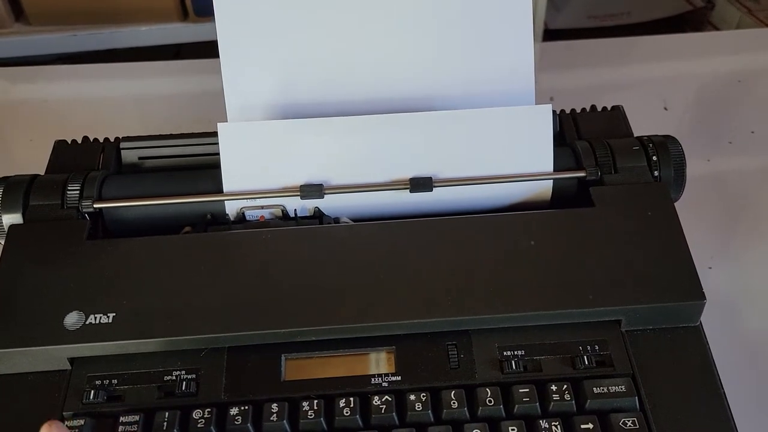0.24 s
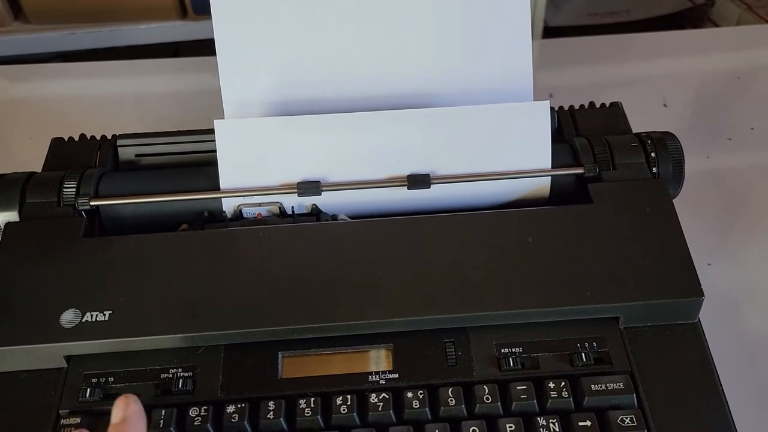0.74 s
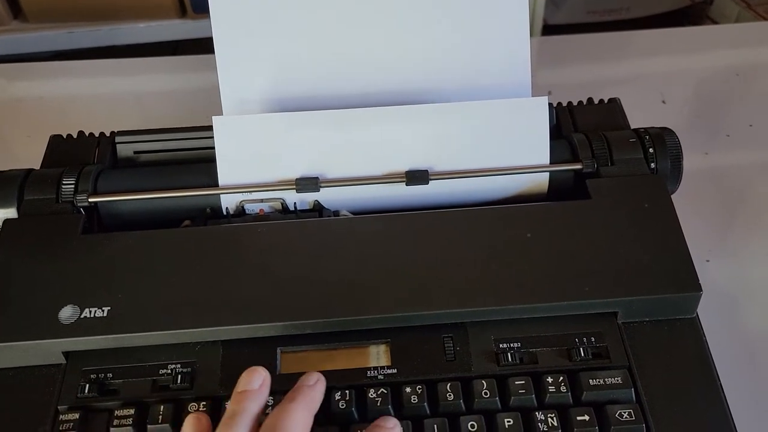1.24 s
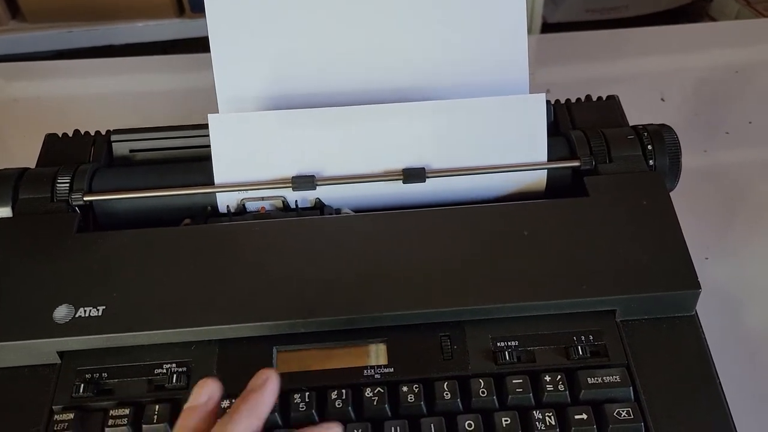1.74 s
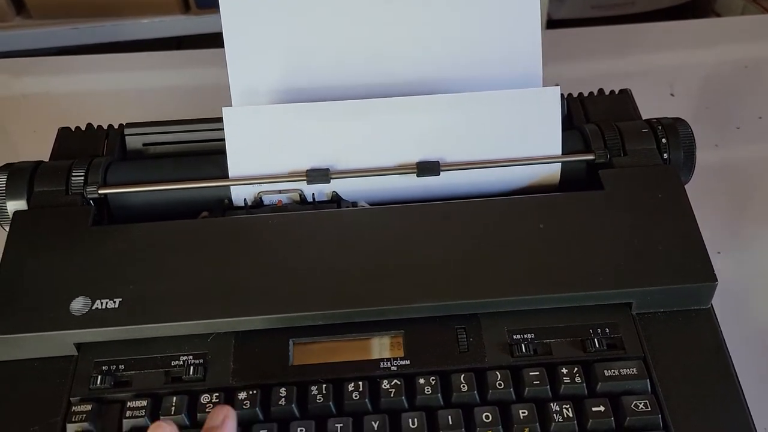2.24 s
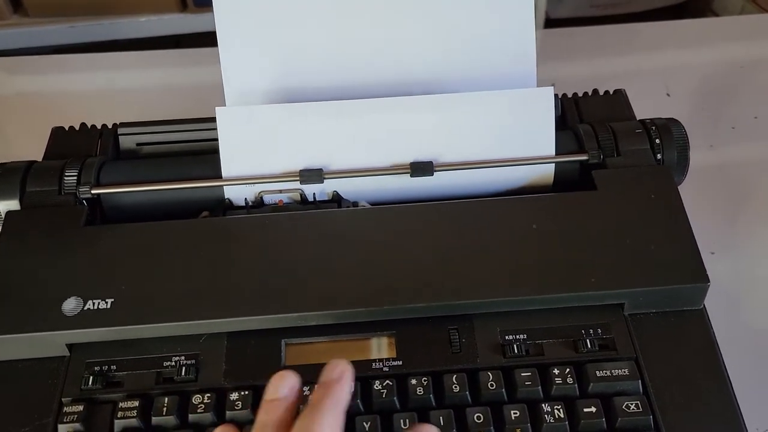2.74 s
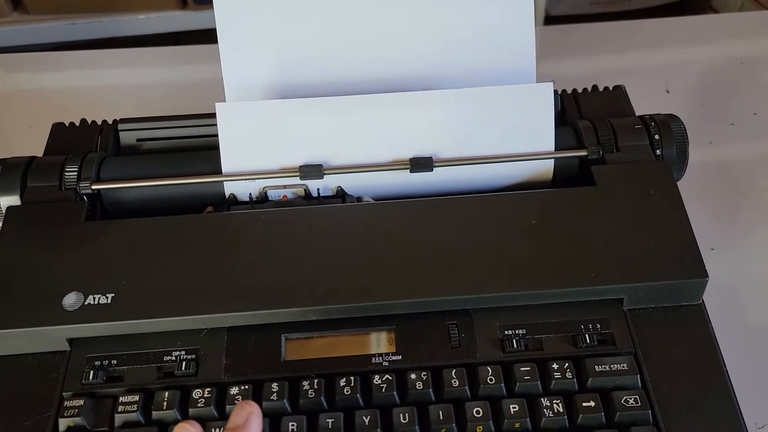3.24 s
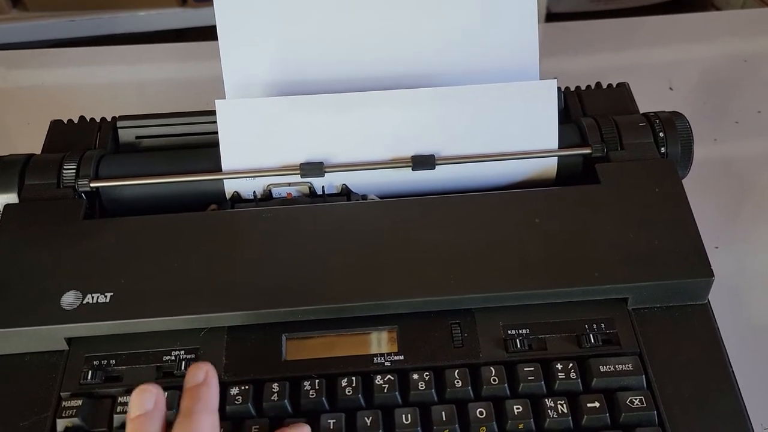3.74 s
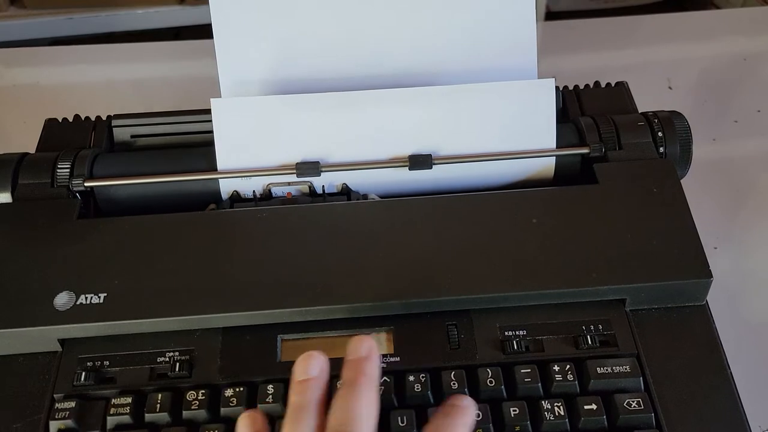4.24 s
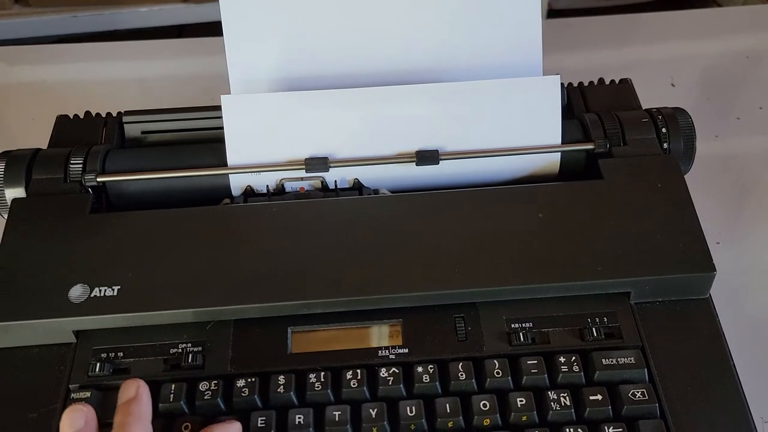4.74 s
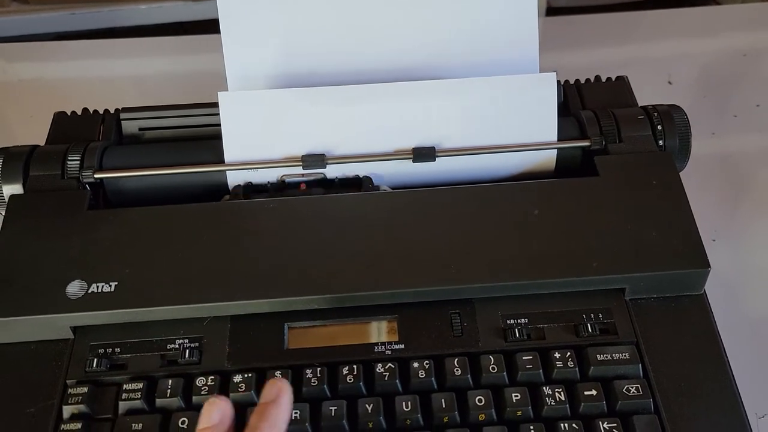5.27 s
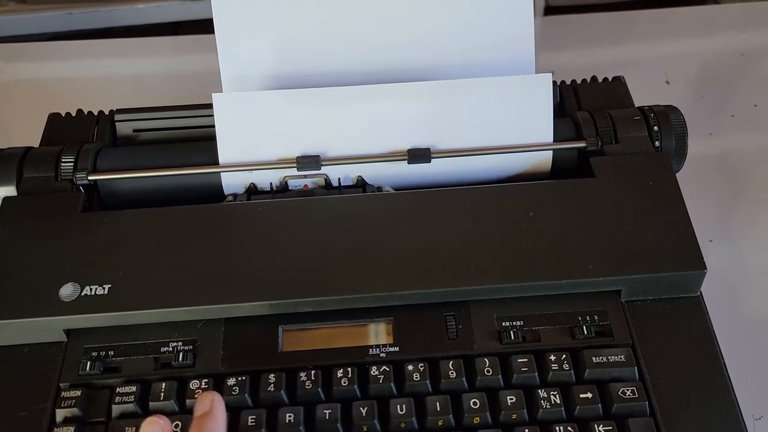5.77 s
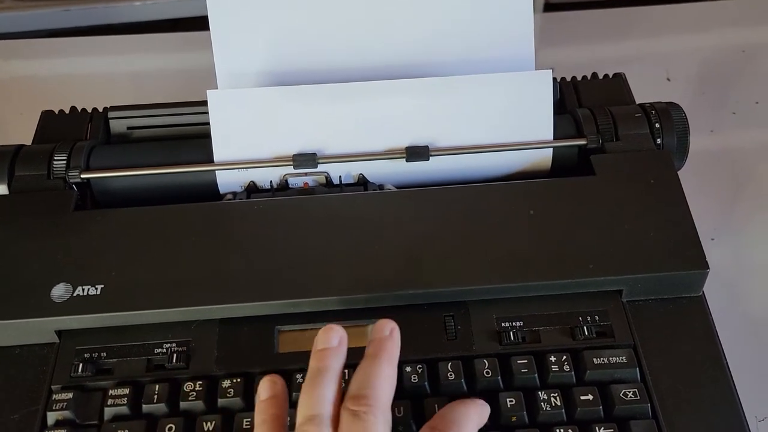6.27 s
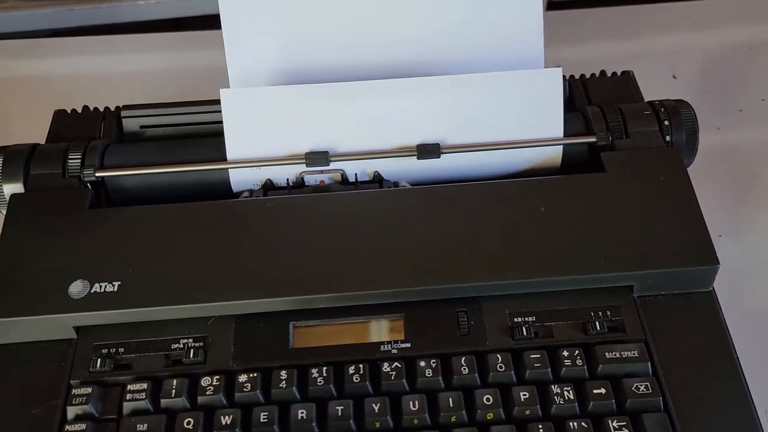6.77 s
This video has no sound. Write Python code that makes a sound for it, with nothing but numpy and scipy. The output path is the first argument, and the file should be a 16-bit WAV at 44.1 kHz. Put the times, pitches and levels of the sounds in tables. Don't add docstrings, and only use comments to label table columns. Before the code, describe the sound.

Someone types slowly on an electric typewriter, each letter a key click, short motor whirr and sharp hammer crack, over a faint low hum.

```python
import sys
import numpy as np
from scipy import signal
from scipy.fft import rfft, irfft, next_fast_len
from scipy.io import wavfile
from scipy.ndimage import uniform_filter1d

SR = 44100
rng = np.random.default_rng(int(sys.argv[2]) if len(sys.argv) > 2 else 0)


def decibels_to_gain(level_db):
    exponent = np.asarray(level_db, float) / 20
    return 10 ** exponent


def materialize(psi):
    bounded = np.clip(np.atleast_2d(psi).T, -1, 1)
    quanta = np.round(bounded * 32767).astype(np.int16)
    wavfile.write(sys.argv[1], SR, quanta)


N = 309141


def evened(x):
    return x / np.sqrt(np.mean(x ** 2) + 1e-20)


def read(points, hz):
    f, value = np.transpose(points)
    return np.interp(np.log(hz + 1), np.log(f + 1), value)


def add(mix, start_s, sound):
    part = mix[..., round(start_s * SR):][..., :sound.shape[-1]]
    part += sound[..., :part.shape[-1]]


def bandpass(x, low_hz, high_hz):
    return signal.sosfilt(signal.butter(2, [low_hz, high_hz], "band", fs=SR, output="sos"), x)


def ring(modes):
    t = np.arange(SR // 3) / SR
    return sum(decibels_to_gain(db - 60 * t / t60) * np.sin(2 * np.pi * hz * t) for hz, db, t60 in modes)


def through(x, peaks):
    damped = [(hz, max(width, 0.09 * hz), db) for hz, width, db in peaks]
    body = ring([(hz, db + 10 * np.log10(width), 2.2 / width) for hz, width, db in damped])[:2048]
    body = bandpass(body, 0.8 * peaks[0][0], min(1.2 * peaks[-1][0], 0.45 * SR))
    return signal.oaconvolve(x, body[None] / np.linalg.norm(body), axes=1)[:, :N]


def pair(shape, apart):
    both, left, right = rng.standard_normal((shape, 3)).T
    return np.array([both + apart * left, both + apart * right]) / np.sqrt(1 + apart ** 2)


def scrape(db, knock_db, snap_db, tick_db, t60, rise=0.0018):
    t = np.arange(4000) / SR
    shape = decibels_to_gain(db - 60 * t / max(t60, 0.004)) * np.minimum(t / rise, 1)
    return np.array([decibels_to_gain(re_db) * shape * pair(len(t), apart=0.86)
                     for re_db in (knock_db, 0, snap_db, tick_db)])


# centre in Hz, width in Hz, level in dB.
PLATE_PEAKS = [(376, 42, -5.5), (651, 500, -2), (848, 270, 1), (1210, 1000, 0.5)]
# centre in Hz, width in Hz, level in dB.
SHELL_PEAKS = [(1442, 100, -9.5), (2100, 400, -13.5), (2590, 1100, 4.5), (3085, 790, 1)]
# centre in Hz, width in Hz, level in dB.
RIB_PEAKS = [(4140, 240, -1.1), (4730, 630, 0.32), (5450, 1200, -2.4)]
# centre in Hz, width in Hz, level in dB.
TINE_PEAKS = [(6640, 2000, 6.5), (8100, 8800, 1), (10940, 6000, -7.5), (13000, 3100, -2.5),
              (15000, 2000, -8)]


def shake_bodies(drive):
    bodies = (PLATE_PEAKS, SHELL_PEAKS, RIB_PEAKS, TINE_PEAKS)
    return sum(through(x, body) for x, body in zip(drive, bodies))


# frequency in Hz, density in dB per Hz.
AIR_SPECTRUM = [(15, -55), (28, -36), (42, -6), (59, -2), (82, -2), (120, -12), (160, -19), (250, -17),
                (450, -24), (1200, -22), (2000, -29), (3500, -35), (5000, -44), (9000, -52), (16000, -45)]
# frequency in Hz, correlation from -1 to 1.
AIR_LIKENESS = [(60, 0.8), (180, 0.7), (550, -0.21), (1650, -0.3), (4970, -0.1), (15000, -0.02)]
# time in seconds, hum in dB, room tone in dB.
AIR_LEVELS = [(0.0, -53, -67), (0.82, -64, -72.5), (1.07, -58.5, -73), (3.119, -59, -68.5),
              (4.16, -60.5, -68.5), (5.27, -58.5, -69), (7.01, -64, -68)]


def air():
    frames, hz = N // 512 + 5, np.fft.rfftfreq(2048, 1 / SR)
    a, b, c, d, patches = rng.standard_normal((frames, 1025, 5)).T
    patches = evened(uniform_filter1d(uniform_filter1d(patches, 12, 0), 8, 1))
    same = np.clip(read(AIR_LIKENESS, hz), -1, 1)[:, None]
    left = a + 1j * b
    z = np.array([left, same * left + np.sqrt(1 - same ** 2) * (c + 1j * d)])
    z *= decibels_to_gain(read(AIR_SPECTRUM, hz)[:, None] + 1.5 * patches)
    s, *levels_db = np.transpose(AIR_LEVELS)
    out = np.zeros((2, N))
    for band, db in zip((hz < 200, hz >= 200), levels_db):
        part = signal.istft(z * band[:, None], nperseg=2048, noverlap=1536)[1][:, :N]
        out += evened(part) * decibels_to_gain(np.interp(np.arange(N) / SR, s, db))
    return out


# frequency in Hz, level in dB re low rumble.
HUM_LINES = [(59, -2.5), (87, -13.5), (118, -11), (250, -24), (392, -24)]


def hum():
    t = np.arange(N) / SR
    s, db = np.transpose(AIR_LEVELS)[:2]
    swell_db = 2.2 * np.sin(2 * np.pi * 1.5 * t) + 1.2 * np.sin(2 * np.pi * 6.5 * t)
    lines = sum(decibels_to_gain(line_db) * np.sin(2 * np.pi * hz * t) for hz, line_db in HUM_LINES)
    return decibels_to_gain(np.interp(t, s, db) + swell_db) * lines


# multiple of the step rate, level in dB.
WHINE_HARMONICS = [(1, 1), (2, 1), (3, -6)]


def whirl(s, db, whine_db, thrum_db, grind_db, fizz_db):
    t = np.arange(s[0], s[-1], 1 / SR)
    level = decibels_to_gain(np.interp(t, s, db)) * signal.windows.tukey(len(t), 0.1)
    teeth = evened(decibels_to_gain(2.2 * np.repeat(rng.standard_normal(len(t) // 60 + 1), 60)[:len(t)]))
    bright = np.minimum((t - s[0]) / 0.015, 1) ** 2
    knock, clack, snap, tick = (level * teeth * pair(len(t), apart=0.7) for _ in range(4))
    speed = 1 - 0.27 * np.exp(-(t - s[0] - 0.024) / 0.021) - 0.06 * np.exp((t - s[-1]) / 0.008)
    wobble = 1 + 0.08 * uniform_filter1d(rng.standard_normal(len(t)), 200)
    step_hz = 1650 * np.clip(speed, 0.72, 1) * wobble
    turns = np.cumsum(step_hz) / SR
    tones = sum(decibels_to_gain(g) * np.cos(2 * np.pi * k * turns) for k, g in WHINE_HARMONICS)
    whine = level * decibels_to_gain(np.interp(t, s, whine_db)) * tones
    return np.array([knock * decibels_to_gain(np.interp(t, s, thrum_db)), clack + whine,
                     snap * decibels_to_gain(grind_db) + 0.36 * whine, bright * tick * decibels_to_gain(fizz_db)])


# start in seconds, length in seconds, rattle in dB,
# whine in dB re rattle, detent click in dB.
SEEK_RUNS = [(0.879, 0.085, -38, -2, -36), (1.395, 0.099, -40, -5.5, -33), (1.657, 0.082, -39.5, -8, -53),
             (2.213, .071, -41, -2.5, -36.5), (2.65, 0.06, -41.5, 2, -37), (3.393, 0.078, -40, -3, -37.5),
             (3.755, 0.062, -40, -1.5, -51), (4.195, 0.078, -41, -2.5, -38),
             (4.746, .046, -42.5, 1.5, -28.5), (5.21, .068, -41, -3, -41.5), (5.837, .098, -40.5, 1.5, -32),
             (6.314, .077, -40, -4.5, -47), (6.902, 0.13, -41, 1, -39.5)]
# start in seconds, run in seconds,
# rattle in dB, sag over the run in dB.
HOME_RUNS = [(0, 0.018, -39.5, -2), (.055, 0.038, -46.5, 5.5), (.997, 0.12, -34, -10),
             (1.531, .078, -37, -1.5), (1.777, .1, -37.5, -6.5), (2.324, .086, -42, 3),
             (2.746, 0.094, -39, -2.3), (3.037, .07, -39.5, -9.5), (3.5, 0.079, -41, 3.5),
             (3.85, .084, -39.5, -1), (4.308, 0.094, -38, -4.5), (4.83, 0.098, -34, -11),
             (5.318, 0.1, -35.5, -7.5), (5.47, 0.031, -53, 13.5), (5.972, 0.11, -34.5, -11),
             (6.431, .082, -41, 1.9)]
# centre in Hz, width in Hz, level in dB.
FRAME_PEAKS = [(2420, 300, 6.5), (3180, 300, -4.5)]


def steppers():
    drive = np.zeros((4, 2, N))
    for start, length, db, whine_db, detent_db in SEEK_RUNS:
        spin_up_s, brake_s, swell_db = 0.021, 0.018, 1
        s = start + np.array([0, spin_up_s, length - brake_s, length])
        rattle_db = db + np.array([-19.5, 0, swell_db, swell_db - 5])
        sing_db = whine_db + np.array([-7, 0, -2, -2])
        add(drive, start, whirl(s, rattle_db, sing_db - 7.5, -17.0 + 0 * s, grind_db=-2.5, fizz_db=-6.0))
    for start, run, db, sag_db in HOME_RUNS:
        coast_s, coast_db = 0.048, -21.5
        s = start + np.array([0, run, run + coast_s])
        rattle_db = db + np.array([0, sag_db, sag_db + coast_db])
        add(drive, start, whirl(s, rattle_db, -17 + 0 * s, [-8.5, -8.5, -3], grind_db=-4.0, fizz_db=-5.5))
    return shake_bodies(drive) + decibels_to_gain(-3.5) * through(drive[1], FRAME_PEAKS)


# touch in seconds, touch in dB, tick in dB re touch, bottoming out after
# in seconds, bottom in dB.
KEY_PRESSES = [(.817, -43, -8, .013, -33), (1.3289, -44, -6, .0225, -37.5),
               (2.1699, -38.5, -9, .0075, -29.5), (2.608, -42, -14, .0103, -34.5),
               (3.3428, -31.5, -6, .007, -28.5), (3.704, -34.5, -4.5, 0.0067, -28),
               (4.125, -48, -13.5, 0.025, -39.5), (4.695, -43, -1.5, .0192, -40.5),
               (5.156, -37, -3.5, .0096, -37.5), (5.792, -33, -14, .01, -37.5),
               (6.263, -41.5, -7, .011, -37), (6.8487, -47, -13, .0179, -41)]
# start in seconds, peak in dB.
RIBBON_LIFTS = [(0.9579, -25.5), (1.4917, -25), (1.7373, -26.5), (2.2841, -26.5), (2.7056, -25),
                (3.46, -27), (3.8106, -27), (4.269, -27), (4.7901, -28), (5.2792, -28), (5.9338, -27),
                (6.392, -27)]
# start in seconds, peak in dB, t60 in seconds.
KEY_RETURNS = [(.0078, -16.5, 0.014), (0.0153, -21, 0.013), (.086, -25, 0.014), (.402, -69.5, .04),
               (1.4607, -21.5, .014), (1.6404, -16.5, .022), (3.1384, -27.5, .012), (4.2437, -17, 0.021),
               (5.257, -9.5, .011), (5.4358, -24, 0.021), (6.3506, -18, 0.021)]
# start in seconds, peak in dB, t60 in seconds.
BAR_LINKS = [
    (.0574, -35.5, .054),
    (.0647, -29, .044),
    (2.9723, -43, .054),
    (2.9855, -41.5, .023),
    (3.0005, -31.5, .06),
    (3.039, -26.5, .021),
    (3.1089, -35.5, .07),
    (5.466, -29, .045),
    (5.5533, -39.5, .098),
    (5.6521, -46.5, .033),
]


def contacts():
    rows = []  # (s, peak dB, knock dB, snap dB, tick dB, t60 s[, rise s])
    for s, db, tick_db, after_s, bottom_db in KEY_PRESSES:
        rows.append((s, db, -12, -9, tick_db - 6, 0.056, 0.0013))
        rows.append((s + after_s, bottom_db, 0, -14, -17, 0.0363))
    rows += [(run[0] + 0.027, run[-1], -21, -11.5, -14.5, 0.09) for run in SEEK_RUNS]
    rows += [(s + 0.0012, db, -11.5, -6, -8.5, 0.12) for s, db in RIBBON_LIFTS]
    rows += [(s, db, -13.5, -20.5, -16.5, t60) for s, db, t60 in KEY_RETURNS]
    rows += [(s, db, -9.5, -6.5, -16, t60) for s, db, t60 in BAR_LINKS]
    drive = np.zeros((4, 2, N))
    for s, *colour in rows:
        add(drive, s - 0.001, decibels_to_gain(2.5) * scrape(*colour))
    return shake_bodies(bandpass(drive, 380, 9500))


# start in seconds, level in dB.
SPACE_STEPS = [
    (0.056, -11),
    (3.042, -12),
    (5.47, -11),
]
# time in seconds, peak in dB, carriage latch in dB re peak.
HAMMER_BLOWS = [(.988, -7.5, -15.5), (1.5219, -6.5, -14.5), (1.7677, -6.5, -17), (2.315, -7, -15),
                (2.7367, -8, -14), (3.4905, -8, -13.5), (3.8409, -8, -13.5), (4.2988, -8, -14.5),
                (4.8205, -8.5, -14.5), (5.3081, -8.5, -14.5), (5.9634, -8.5, -14), (6.4216, -7.5, -14)]
# frequency in Hz, level in dB, t60 in seconds.
CASE_RING = [(58, -15, 0.084), (86, -0.5, 0.049), (133, -2.5, 0.041), (171, -5.5, 0.11), (332.7, 2, 0.081),
             (370, -5.5, .04), (660, -7, 0.065)]


def case_thuds():
    thud = np.zeros((2, N))
    for s, db in SPACE_STEPS:
        add(thud, s, decibels_to_gain(db - 9.0) * pair(2400, apart=0.45) * np.hanning(2400))
    for s, db, latch_db in HAMMER_BLOWS:
        add(thud, s + 0.0014, decibels_to_gain(db - 7) * pair(500, apart=0.45) * np.hanning(500))
        add(thud, s + 0.02, decibels_to_gain(db - 12) * pair(1800, apart=0.57) * np.hanning(1800))
    case = bandpass(ring(CASE_RING), 45, 900)
    return decibels_to_gain(-44) * signal.oaconvolve(thud, case[None], axes=1)[:, :N]


# start in seconds, peak in dB, length in seconds.
WIRE_ZIPS = [(0.108, -37.5, 0.018), (1.644, -37.5, .02), (.064, -39, 0.007), (2.973, -55, 0.013),
             (2.998, -40.5, 0.019), (3.111, -48, 0.014), (3.16, -48, .012), (4.698, -51, 0.011),
             (5.791, -46, .01)]
# centre in Hz, width in Hz, level in dB.
WIRE_PEAKS = [(8500, 3000, -7), (12400, 2000, 1), (15000, 2700, -4.5)]


def wires():
    drive = np.zeros((2, N))
    for s, db, length_s in WIRE_ZIPS + [(s, db + 1, 0.009) for s, db in RIBBON_LIFTS]:
        size = round(length_s * SR)
        add(drive, s - 0.003, decibels_to_gain(db) * np.hanning(size) * pair(size, apart=0.82))
    return through(drive, WIRE_PEAKS)


# start in seconds, peak in dB, chatter length in seconds,
# tick in dB re peak.
BAR_SPRINGS = [
    (0.108, -16.5, 0.03, -11.5),
    (3.1597, -23.5, 0.034, -12.5),
    (5.5819, -22, 0.034, -14),
]
# frequency in Hz, level in dB, t60 in seconds.
BAR_RING = [(1980, -12, .1), (2640, 4, .035), (2680, -25, .25), (3280, -7, .06), (3880, -6, .05),
            (5010, -5, .04), (5320, -28, .3), (5800, -4, .03), (7140, -7, .03)]


def space_bar():
    out = np.zeros((2, N))
    for s, db, length_s, tick_db in BAR_SPRINGS:
        t = np.arange(round(1.3 * length_s * SR)) / SR
        fade = signal.windows.tukey(len(t), 0.15) * (1 + 0.7 * np.exp(-t / 0.0047))
        hits = decibels_to_gain(db - 12 * t / length_s) * fade * pair(len(t), apart=1.0)
        hits = np.pad(hits, ((0, 0), (0, 2000)))
        add(out, s - 0.002, decibels_to_gain(-31.0) * signal.oaconvolve(hits, ring(BAR_RING)[None], axes=1))
        add(out, s - 0.002, shake_bodies([decibels_to_gain(body_db) * hits for body_db in (-15, -7, -9, tick_db)]))
    return out


# centre in Hz, width in Hz, level in dB.
SPRING_PEAKS = [(7500, 700, -6), (7800, 770, 0.5), (9600, 1200, -9)]


def springs():
    drive = np.zeros((2, N))
    for s, db, tick_db, after_s, bottom_db in KEY_PRESSES:
        add(drive, s, scrape(db + tick_db - 2, 0, 0, 0, 0.055)[1])
    return through(drive, SPRING_PEAKS)


def hammer_linkage():
    drive = np.zeros((4, 2, N))
    for s, db, latch_db in HAMMER_BLOWS:
        add(drive, s - 0.028, scrape(db - 27.5, -9.5, -7.5, -13.5, 0.84, rise=0.0061)[..., :1200])
        add(drive, s - 0.011, scrape(db - 21.0, -15, 0.055, -3.5, 0.23, rise=0.00087)[..., :460])
        add(drive, s + 0.0015, scrape(db - 10, -10.0, -0.79, -3, 0.03))
        add(drive, s + 0.02, scrape(db + latch_db - 1.5, -9.0, -0.74, -0.7, 0.071, rise=0.006))
    return shake_bodies(drive)


# frequency in Hz, level in dB, t60 in seconds.
HAMMER_RING = [(1290, -14.5, 0.011), (2220, -8.5, 0.011), (3037, -3, 0.013), (3730, 0.5, 0.006),
               (4260, -8.5, 0.011), (4880, 0.5, 0.007), (5440, -3.5, 0.007), (6390, -4, 0.0068),
               (7800, -1.5, 0.005), (8630, -3.5, 0.0066), (9880, -3.5, 0.0055), (11180, -4.5, 0.0057),
               (13640, -6, .005), (15300, -6.5, .004)]


def hammer():
    crack = np.zeros((2, N))
    t = np.arange(800) / SR
    swell = (1 - np.exp(-t / 0.00035)) ** 2
    modes = np.array(HAMMER_RING)[:, :, None, None]
    hz, mode_db, t60 = modes[:, 0], modes[:, 1], modes[:, 2]
    for s, db, latch_db in HAMMER_BLOWS:
        letter = rng.standard_normal((len(modes), 3))
        detune, port_phase = 1 + 0.038 * letter[:, :1, None], 0.31 * letter[:, 1:, None]
        phase = 2 * np.pi * (hz * t * detune + port_phase)
        rung = (decibels_to_gain(mode_db - 60 * t / t60) * np.sin(phase)).sum(0)
        add(crack, s - 0.0005, decibels_to_gain(db - 17) * evened(swell * rung))
    return decibels_to_gain(6.5) * crack


# frequency in Hz, t60 in seconds.
WALL_DECAY = [(200, 0.43), (700, 0.44), (2000, 0.33), (5000, 0.4), (12000, 0.27)]


def room(x):
    size = SR // 2
    taps = np.zeros((2, size))
    slots = np.arange(120, size - 20, 20)
    at = slots + rng.integers(0, 20, (2, len(slots)))
    np.put_along_axis(taps, at, rng.choice([-1., 1.], at.shape), 1)
    hz, t, z = signal.stft(taps, SR, nperseg=256)
    tail = signal.istft(z * decibels_to_gain(-60 * t / read(WALL_DECAY, hz)[:, None]), SR, nperseg=256)[1]
    return signal.fftconvolve(x.mean(0)[None], tail / np.linalg.norm(tail[0]), axes=1)[:, :N]


# frequency in Hz, left re right in dB.
PORT_COLOUR = [(60, 0.0), (150, -1.0), (380, -0.5), (950, -3.5), (2380, -2.5), (5980, -1.5), (15000, -1.5)]


def ports(x, lag_samples=5.41):
    size = next_fast_len(N)
    hz = np.fft.rfftfreq(size, 1 / SR)
    half = decibels_to_gain(read(PORT_COLOUR, hz) / 2) * np.exp(1j * np.pi * hz * lag_samples / SR)
    return irfft(rfft(x, size) * np.array([half, 1 / half]), size)[:, :N]


def scene():
    whirr = steppers()
    taps = contacts() + wires() + springs() + hammer_linkage()
    blows = case_thuds() + hammer()
    bar = space_bar()
    echo = room(decibels_to_gain(-16.0) * blows + decibels_to_gain(-12.5) * whirr + decibels_to_gain(-12.0) * taps + decibels_to_gain(-22) * bar)
    return decibels_to_gain(-2.0) * ports(blows + whirr + taps + bar) + echo + air() + hum()


def top_cut(x):
    return signal.sosfilt(signal.butter(12, 16660, fs=SR, output="sos"), x)


def record(dry):
    low_pass = signal.firwin(255, 15900, window=("kaiser", 3), fs=SR)
    x = signal.oaconvolve(dry, low_pass[None], "same")
    return top_cut(np.clip(x, -1, 1))


dry = scene()
out = record(dry)
materialize(out)
```